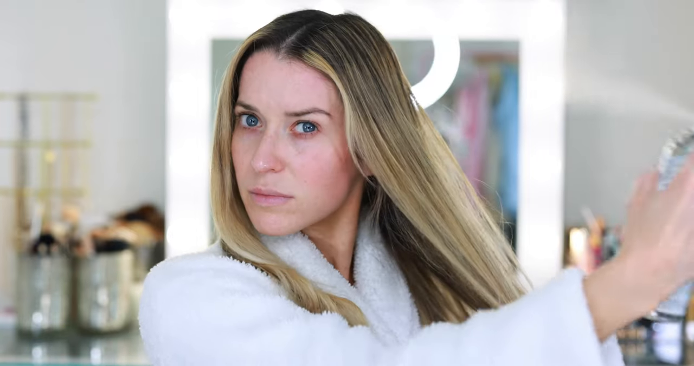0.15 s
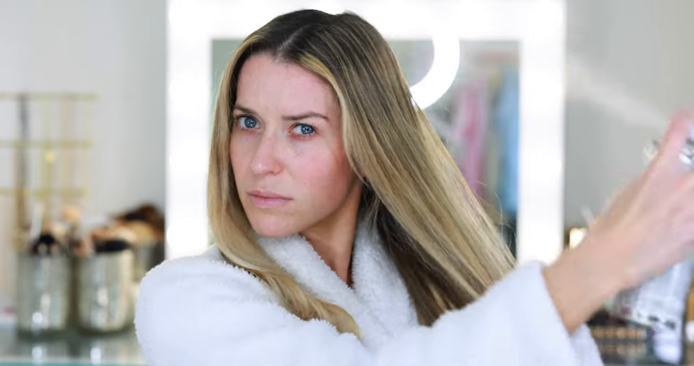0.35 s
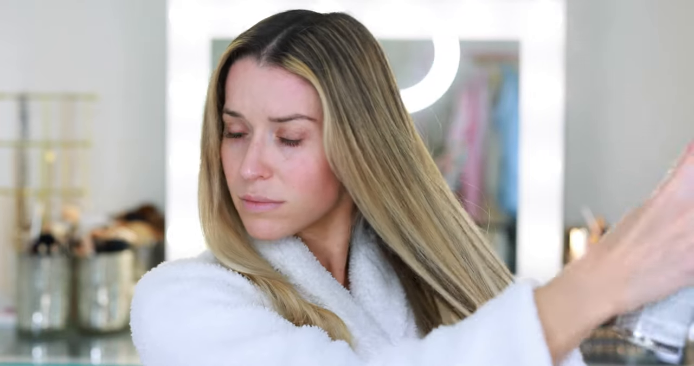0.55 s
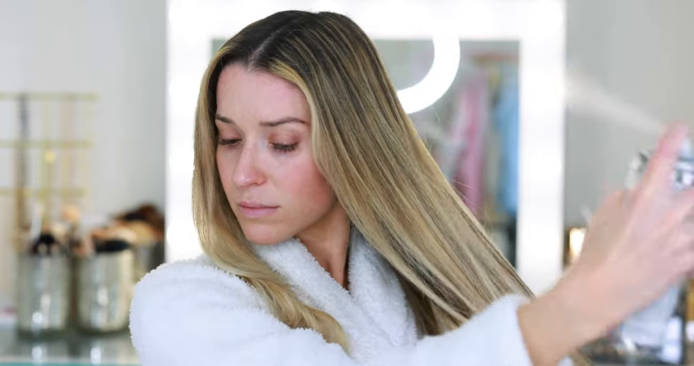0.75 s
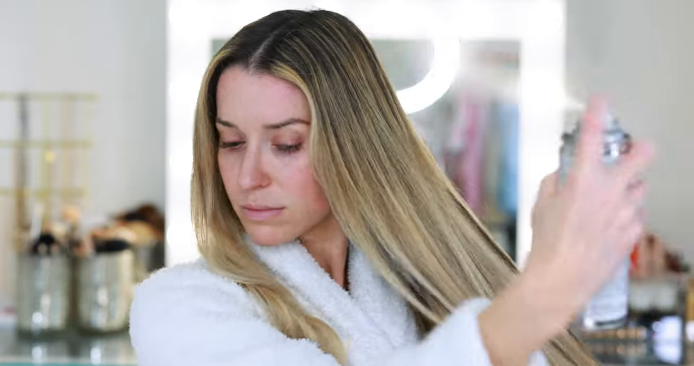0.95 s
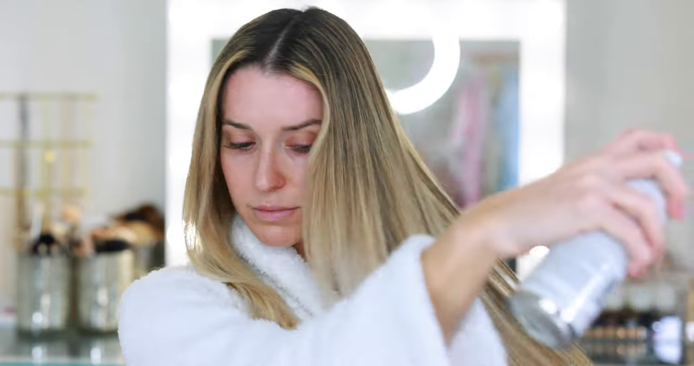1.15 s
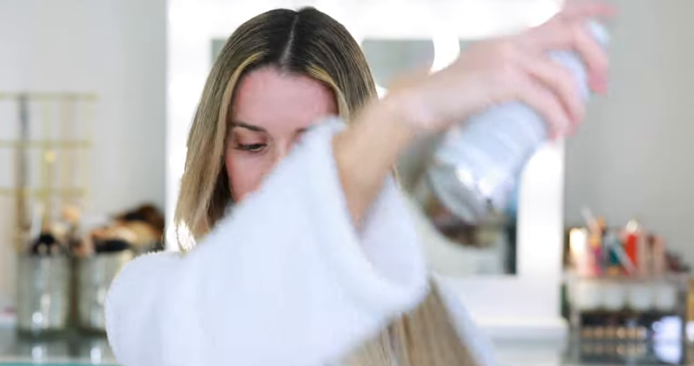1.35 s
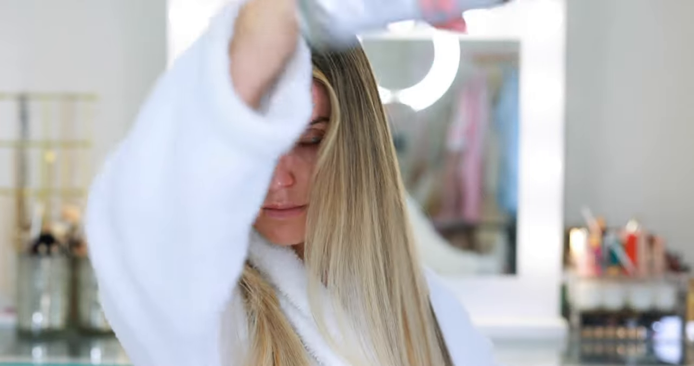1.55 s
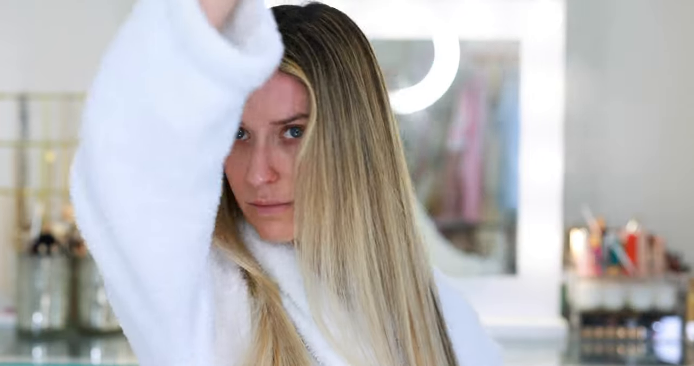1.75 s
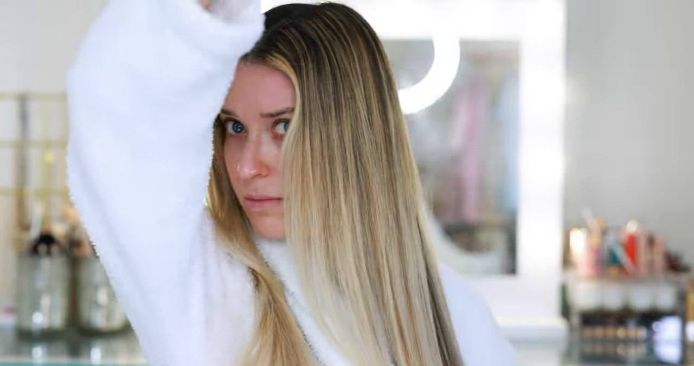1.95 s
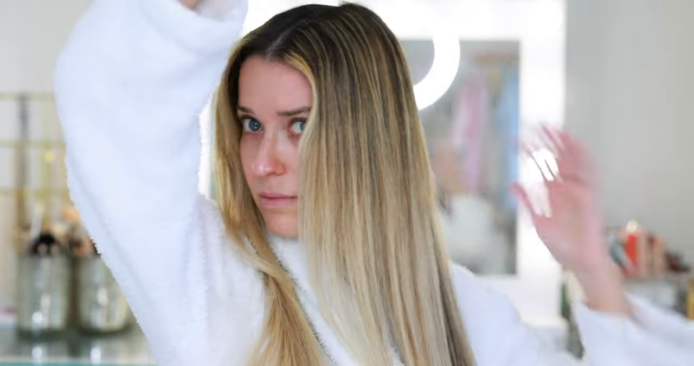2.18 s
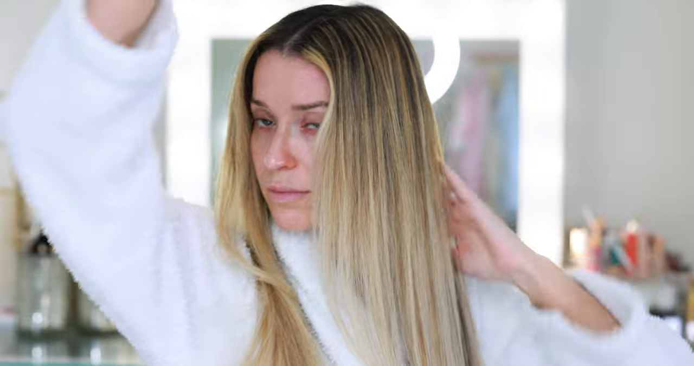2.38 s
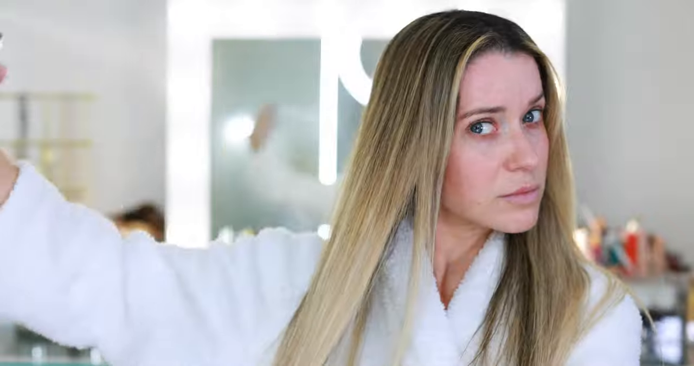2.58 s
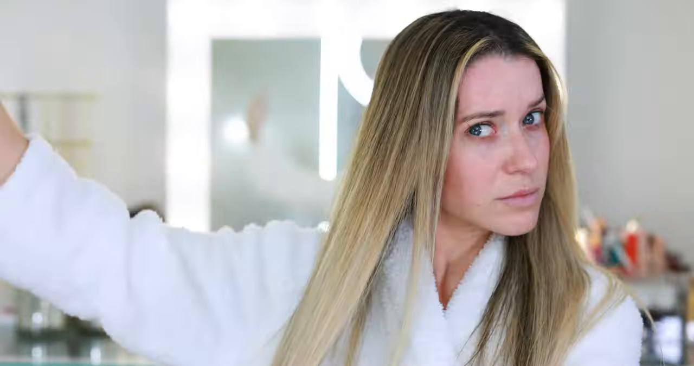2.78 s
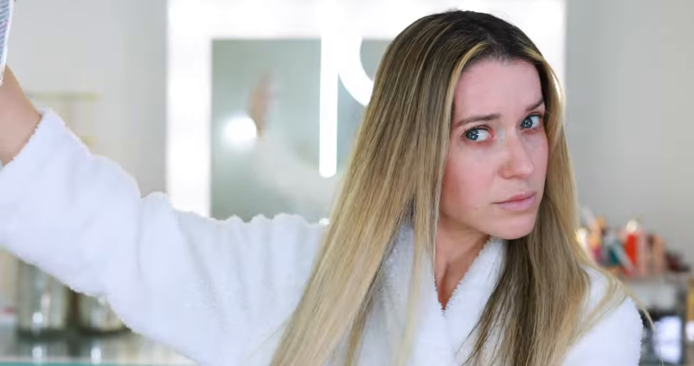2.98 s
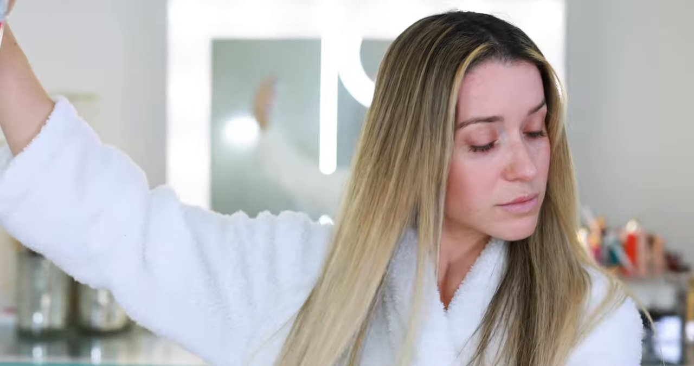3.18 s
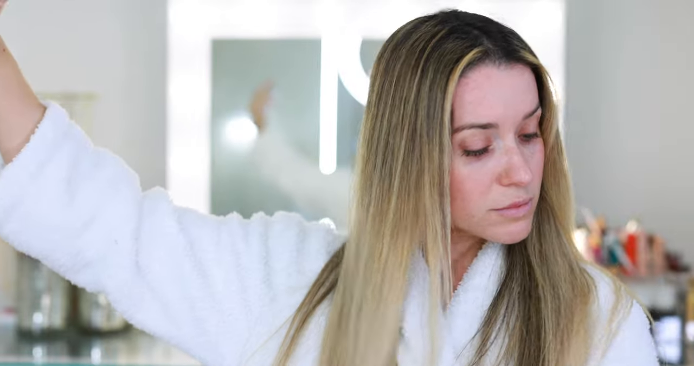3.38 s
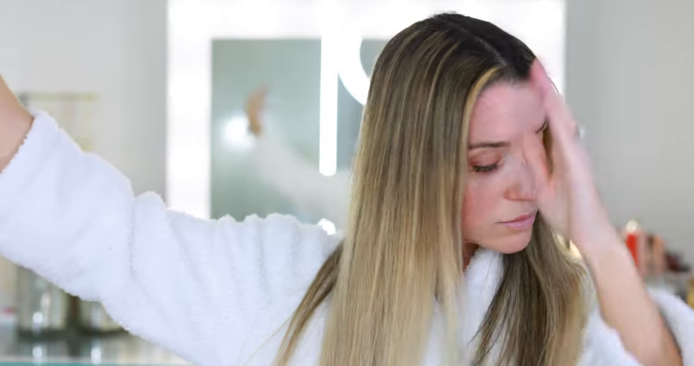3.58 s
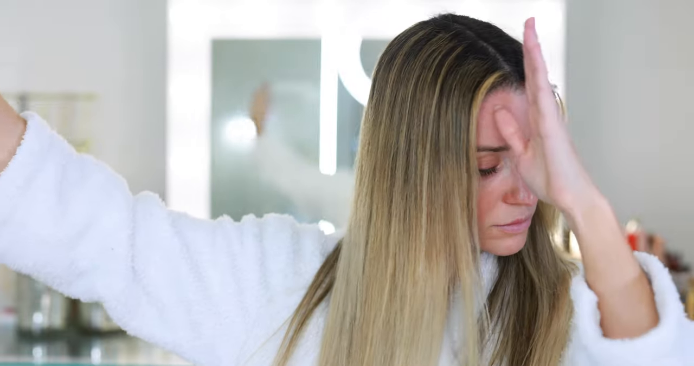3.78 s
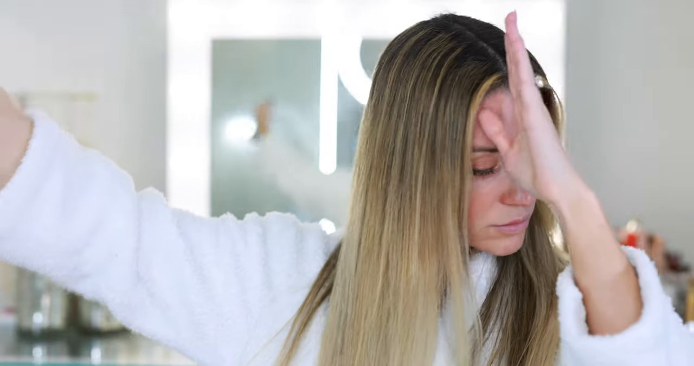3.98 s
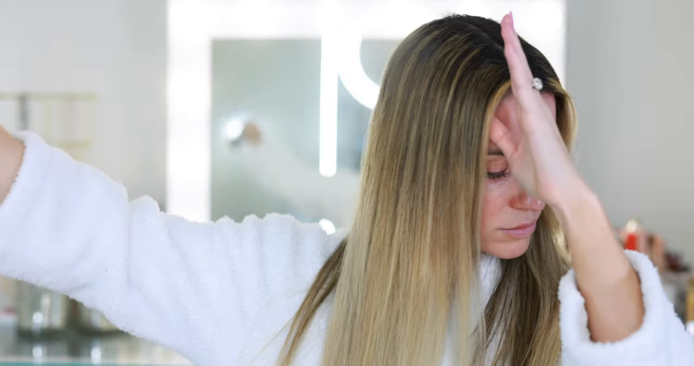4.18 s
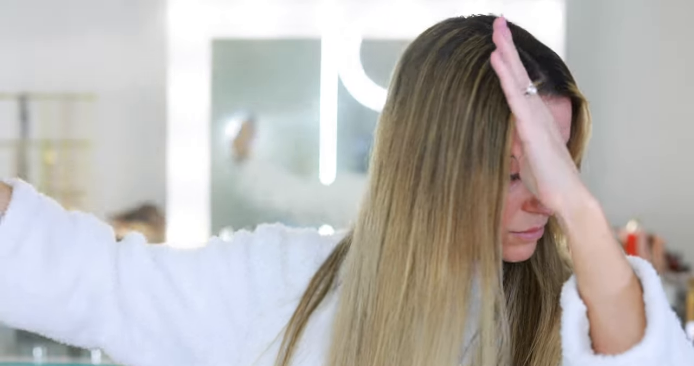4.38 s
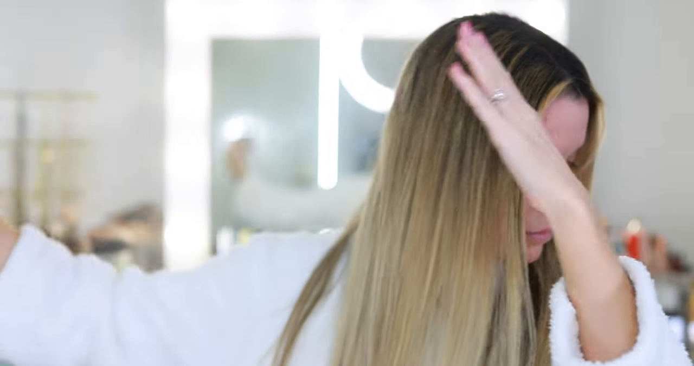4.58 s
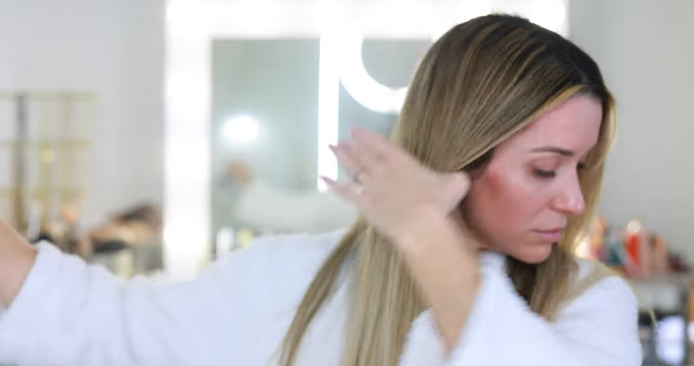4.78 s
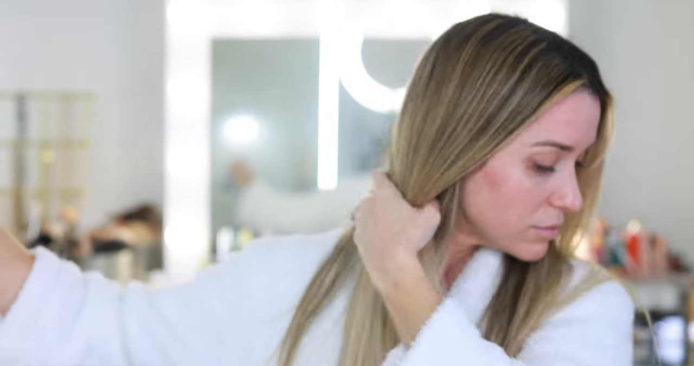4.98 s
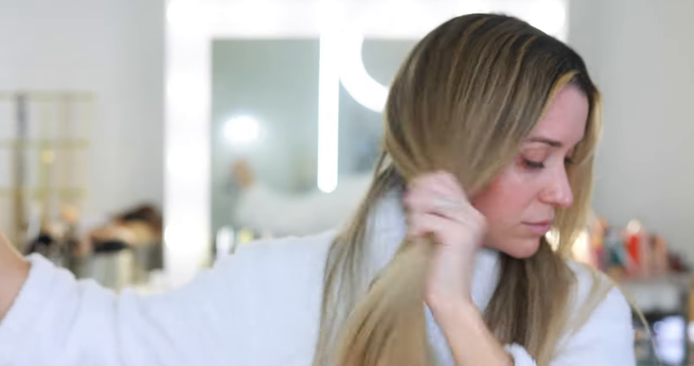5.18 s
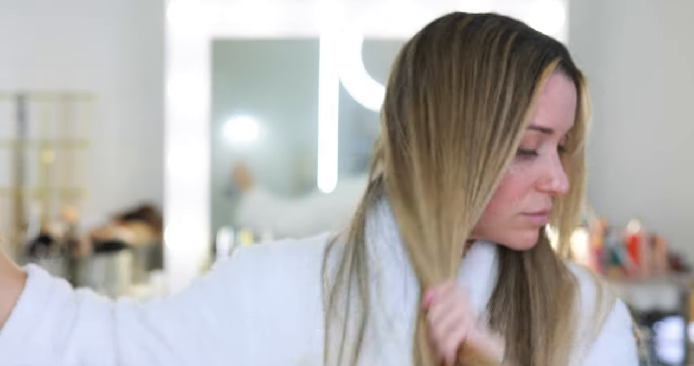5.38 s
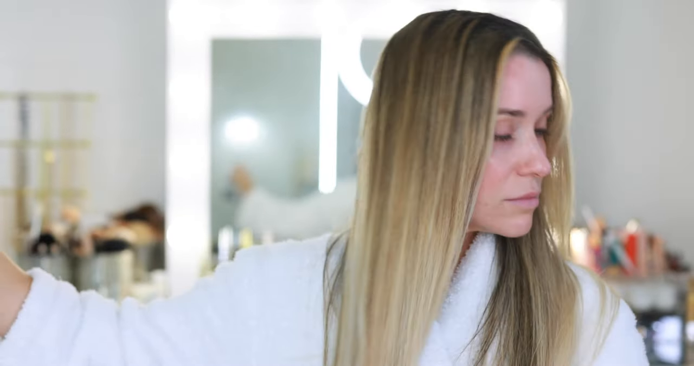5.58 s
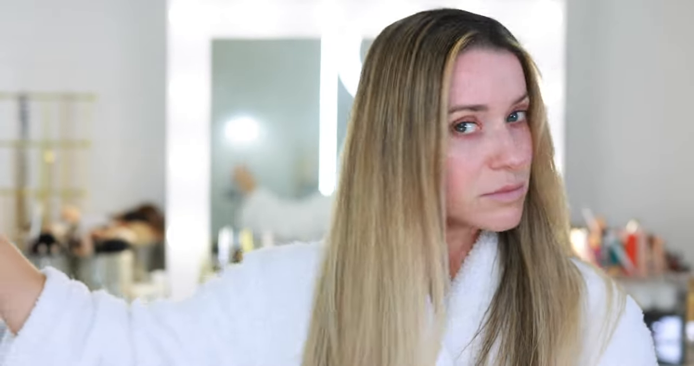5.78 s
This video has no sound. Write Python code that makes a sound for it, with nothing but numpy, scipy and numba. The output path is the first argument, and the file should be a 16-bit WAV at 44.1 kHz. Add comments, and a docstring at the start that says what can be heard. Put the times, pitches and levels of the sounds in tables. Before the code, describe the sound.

An aerosol can hisses in five bright, airy sprays of varying length, with faint hair rustles and small clicks between, in a quiet room.

```python
"""Small furnished room: an aerosol can, swung about near a microphone, mists long hair in five sprays.
Jet: noise bands and a nozzle resonance, levels driven by valve and swings; brief bands and whistles on top.
Between sprays: rustling noise of a hand in the hair, damped-cosine snaps, ringing ticks, soft low thumps.
Beneath: rumble noise, narrow drones and a wavering hum. A short dense tail follows jet and clicks."""
import sys
import numpy as np
from scipy import signal
from scipy.fft import rfft, irfft
from scipy.io import wavfile
from scipy.ndimage import uniform_filter1d
from numba import njit

SR = 44100
rng = np.random.default_rng(int(sys.argv[2]) if len(sys.argv) > 2 else 0)


def to_wav(s):
    """Save 16-bit WAV."""
    ch = np.atleast_2d(s).T  # columns
    pcm = np.round(np.clip(ch, -1, 1) * 32767)  # PCM
    wavfile.write(sys.argv[1], SR, pcm.astype(np.int16))


N = 257544
TIME = np.arange(N) / SR
FREQ = np.arange(N // 2 + 1) * SR / N + 1  # +1 Hz keeps the log finite

# can swings, jet points nearer the microphone: centre t/s, jet swell/dB (negative: dip), length/s,
# mist swell/dB, bright band rms at its height/dB, bright band f/Hz
SWINGS = [(0.225, 1.5, 0.1, 1, -54, 7700), (0.307, 4.5, 0.19, 1, -44, 8300),
          (0.991, 5, 0.16, 3, -49.5, 7800), (1.166, -2.5, 0.18, 2, -55.5, 5160),
          (1.924, 3, 0.16, 4, -50, 6100), (2.082, 3, .1, 3, -58, 7500), (2.735, 6, .15, 6, -49, 7040),
          (3.8, 1, .14, 0, -56, 7200), (3.998, 6, 0.14, 3.5, -43.5, 13600),
          (4.234, 6, 0.19, 3.5, -41, 14200), (4.523, 5, 0.19, 4, -40, 14300),
          (4.727, 7, 0.11, 5, -53, 13000)]
# rumble spectrum: f/Hz, relative density/dB per Hz
RUMBLE = [(12, -24), (20, -6.5), (49, -5), (137, -4.5), (197, -6), (326, -13.5), (375, -16), (496, -19),
          (586, -24.5), (819, -25), (916, -24.5), (1020, -23.5), (15800, -35)]
RUMBLE_RMS_DB = -61


def spray():
    """Turbulent jet: each part of its spectrum swells as the can turns, and flickers with the droplets."""
    # jet spectrum, sets the tilt inside each band: f/Hz, density/dB per Hz
    jet_density = [(180, -1.5), (400, -11), (800, -9), (1750, -7.5), (2700, -4.5), (3100, -12), (5000, -8),
                   (6200, -0.5), (8700, -0.5), (10500, 1.5), (13400, 1.5), (14600, 0), (15700, -1)]
    # jet bands, top to bottom: low edge f/Hz, high edge f/Hz
    band_edges_hz = [(9000, 17000), (5500, 9000), (3000, 5500), (1600, 3000), (600, 1600), (320, 600)]
    nozzle_width_hz, nozzle_trim_db, flicker_db = 2250, -4.5, 1.25
    cap_hz, cap_width_hz, cap_re_upper_mist_db = (2435, 2630), 100, -12.5

    bands_db, nozzle_hz, opening = valve()
    stutter_db = -6 * np.exp(-((TIME - .06) / .006) ** 2)  # the first jet catches once
    sputter_db = .5 * walk(60) + stutter_db

    # resonance of the nozzle bore
    bore = svf(rng.standard_normal(N), nozzle_hz, nozzle_width_hz)
    bore = svf(bore, nozzle_hz, nozzle_width_hz)
    out = undb(bands_db[1] + nozzle_trim_db + sputter_db) * unit(bore)

    trims_db = (0, -3.5, 0, 0, 0, 0)
    for (lo_hz, hi_hz), band_db, trim_db in zip(band_edges_hz, bands_db, trims_db):
        level_db = band_db + trim_db + sputter_db + flicker_db * walk(24.87)
        out = out + undb(level_db) * noise(shape(jet_density) * band(lo_hz, hi_hz, order=6))

    # hollows of the cap, blown on and off by the jet
    for hz in cap_hz:
        level_db = bands_db[3] + cap_re_upper_mist_db + 3.2 * walk(20)
        out = out + undb(level_db) * noise(peak(hz, cap_width_hz))
    return opening * out


def valve():
    """Valve lift: pressure spurts then settles, gas leads liquid; gives band dB, nozzle Hz and opening gain."""
    # one row a spray: opens t/s, shuts t/s, hiss/dB, nozzle re hiss/dB (before the nozzle trim),
    # mist re hiss/dB, middle re hiss/dB, low rush re mist/dB, nozzle f/Hz, attack/s, first spurt/dB,
    # mist arrives after/s, closing/s
    sprays = [(0.002, 0.441, -50, -1.5, -12.5, -5.5, -10.5, 7800, 0.016, 3, 0.099, 0.11),
              (0.742, 1.238, -50, -2.5, -9, -3.5, -12, 8100, 0.034, 4.5, 0.039, 0.074),
              (1.624, 2.104, -44.5, -3, -14, -7, -6.5, 7740, 0.0056, 3.5, 0.017, 0.043),
              (2.548, 2.799, -44.5, -4.5, -15, -8, -9, 6900, 0.0017, 2, 0.0055, 0.046),
              (3.734, 4.761, -44.5, -3.5, -13, -7, -10, 7400, 0.0056, -2.5, 0.056, 0.03)]
    spurt_s, spurt_nozzle_share = 0.08, 1.6
    mist_start_db, closing_db = -17.5, -27.5  # closing_db: fall per closing time
    swing_nozzle_share, swing_middle_share = 0.9, 0.58  # the treble is beamed most
    lag_middle_share, lag_upper_mist_share = 0.27, 0.51
    upper_mist_re_mist_db = 1.5  # band around the cap's hollows
    crack_open = 0.21  # share of the flow passing as soon as the valve lifts

    rows = np.array(sprays)
    which = np.clip(np.searchsorted(rows[:, 0], TIME) - 1, 0, None)
    (opens, shuts, hiss_db, nozzle_db, mist_db, middle_db, low_db,
     nozzle_hz, attack_s, spurt_db, arrives_s, closing_s) = rows[which].T

    since_s = np.maximum(TIME - opens, 0)
    spurt_db = spurt_db * np.exp(-(since_s / spurt_s) ** 2)
    lag_db = mist_start_db * np.exp(-(since_s / arrives_s) ** 3)  # gas first, liquid later
    swing_db = sum(row[1] * swell(row[0], row[2]) for row in SWINGS)
    mist_swing_db = sum(row[3] * swell(row[0], row[2]) for row in SWINGS)

    hiss_db = hiss_db + closing_db * np.maximum(TIME - shuts, 0) / closing_s
    mist_db = hiss_db + mist_db + mist_swing_db
    bands_db = (
        hiss_db + swing_db + spurt_db,
        hiss_db + nozzle_db + swing_nozzle_share * swing_db + spurt_nozzle_share * spurt_db,
        hiss_db + middle_db + swing_middle_share * swing_db + lag_middle_share * lag_db,
        mist_db + upper_mist_re_mist_db + lag_upper_mist_share * lag_db,
        mist_db + lag_db,
        mist_db + low_db + lag_db)
    opening = (since_s > 0) * np.minimum(crack_open + (since_s / attack_s) ** 2, 1)
    return bands_db, nozzle_hz, opening


def swing_beams():
    """Bright band of gas noise that swells with each swing of the can."""
    width_share, length_share = 0.26, 0.67  # of the band's centre, of the swing's length
    out = np.zeros(N)
    for s, _, length_s, _, db, hz in SWINGS:
        out += undb(db) * noise(peak(hz, width_share * hz)) * swell(s, length_share * length_s)
    return out


def whistles():
    """Brief breathy whistles of cap and valve seat: narrow swells of gas noise."""
    # centre t/s, rms at its height/dB, f/Hz, length/s
    whistle_rows = [(1.137, -58, 2720, 0.17), (1.688, -51.5, 2740, 0.047), (1.962, -57, 2600, 0.066),
                    (2.78, -56, 2580, .03), (2.892, -68, 2720, .04), (3.734, -60, 6900, .011),
                    (4.89, -70, 2800, .02)]
    width_hz = 260
    out = np.zeros(N)
    for s, db, hz, length_s in whistle_rows:
        out += undb(db) * noise(peak(hz, width_hz)) * swell(s, length_s)
    return out


def comb():
    """Soft rustle of towelling, brush of fingers and swish of hair, a little patchy in level."""
    # steady floor: cloth/dB, brush/dB, swish/dB
    floor_db = (-75.5, -83.5, -76.5)
    # strokes of hand and sleeve through the hair: centre t/s, length/s, cloth/dB, brush/dB, swish/dB
    strokes = [(0.54, 0.23, -74, -80, -82), (1.554, 0.53, -81, -76.5, -85), (2.474, .2, -80, -84, -79),
               (3.27, 0.17, -80, -78, -78), (3.457, .08, -71.5, -73, -78), (5.012, 0.072, -65, -89, -80),
               (5.08, 0.067, -65, -88, -77), (5.215, 0.13, -70, -74, -73), (5.415, 0.23, -74.5, -75, -66.5),
               (5.526, .12, -71.5, -66, -66.5), (5.602, 0.067, -71, -76, -66.5)]

    def stroke_gain(k):
        return undb(floor_db[k]) + sum(undb(row[2 + k]) * swell(*row[:2]) for row in strokes)

    cloth = stroke_gain(0) * undb(1.4 * walk(70)) * noise(band(120, 1360, order=2))
    brush = stroke_gain(1) * undb(1.2 * walk(60)) * noise(band(2300, 3800, order=3))
    swish = stroke_gain(2) * undb(.8 * walk(80)) * noise(band(6000, 14000, order=2))
    return cloth + brush + swish


def snaps():
    """Dry snaps: cosines that die within one or two cycles."""
    # t/s, peak before the high-pass/dB, f/Hz
    snap_rows = [(2.919, -44, 6000), (3.358, -58, 3000), (3.4438, -34.5, 4430), (3.449, -41, 3500),
                 (3.456, -56, 8000), (4.846, -41, 10800), (5.4933, -25, 8000), (5.614, -50, 11500),
                 (5.664, -49, 2300)]
    decay_cycles = 0.53  # to 1/e
    out, t = np.zeros(N), TIME[:2048]
    for s, db, hz in snap_rows:
        add(out, s, undb(db) * np.cos(2 * np.pi * hz * t) * np.exp(-t * hz / decay_cycles))
    # too small to push low tones
    return signal.sosfilt(signal.butter(2, 1800, 'high', fs=SR, output='sos'), out)


def ticks():
    """Ticks that ring the modes of a small metal part."""
    # t/s, level/dB, ring length as a share of the free ring
    tick_rows = [(3.3032, -44, .5), (3.307, -49, 2.1), (5.6571, -37.5, 0.94)]
    # modes of the free ring: f/Hz, level re tick/dB, t60/s
    modes = [(7480, 1, 0.011), (8800, 0.5, 0.0038), (10300, 1, .002), (12000, 0, .002), (13600, -2, .002),
             (15000, -7, .003)]
    out, t = np.zeros(N), TIME[:2048]
    contact = 1 - np.exp(-t / .0001)  # builds over about a cycle
    for s, db, free_share in tick_rows:
        ring = sum(undb(mode_db) * np.sin(2 * np.pi * hz * t) * 1000. ** (-t / (free_share * t60_s))
                   for hz, mode_db, t60_s in modes)
        add(out, s, undb(db) * contact * ring)
    return out


def thumps():
    """Soft thumps: short sines under a rounded swell."""
    # centre t/s, swell height/dB, f/Hz, length/s
    thump_rows = [(3.035, -46.5, 59, 0.028), (5.002, -52, 240, .012), (5.032, -51, 170, 0.015),
                  (5.084, -58, 604, 0.016), (5.5, -52, 25, 0.045), (5.615, -51.5, 50, .04)]
    return sum(undb(db) * np.sin(2 * np.pi * hz * (TIME - s)) * swell(s, length_s)
               for s, db, hz, length_s in thump_rows)


def hum():
    """Low sine that wavers in pitch and level."""
    # t/s, level before the waver/dB
    hum_level = [(0.0, -65), (1.5, -71.5), (1.7, -62.5), (2.6, -64.5), (3.4, -64), (3.55, -60.5),
                 (4.3, -59), (4.7, -64), (5.84, -64)]
    hum_hz, wander_rms_hz, waver_rms_db = 59.5, 2.53, 2
    s, db = np.transpose(hum_level)
    tone = np.sin(2 * np.pi * np.cumsum(hum_hz + wander_rms_hz * walk(8)) / SR)
    return undb(np.interp(TIME, s, db) + waver_rms_db * walk(6)) * tone


def drones():
    """Appliance tones ringing in the room: narrow peaks of noise."""
    # f/Hz, width/Hz, rms/dB
    drone_rows = [(129, 36, -70.5), (229.9, 14, -74), (381, 15, -76.5)]
    return sum(undb(db) * noise(peak(hz, width_hz)) for hz, width_hz, db in drone_rows)


def rumble():
    """Rumble and faint hiss of the room: shaped noise."""
    return undb(RUMBLE_RMS_DB) * noise(shape(RUMBLE))


def rumble_side():
    """Faint low rumble, the only difference between two close microphone ports."""
    # f/Hz, side re mid rumble/dB
    side_re_mid = [(30, -17.5), (300, -26), (700, -22.5), (1200, -50), (15000, -70)]
    return undb(RUMBLE_RMS_DB) * irfft(rfft(noise(shape(RUMBLE))) * shape(side_re_mid), N)


def room(x):
    """A short dense tail from walls, mirror and clothes; the treble dies sooner."""
    t60_s, late_t60_s, late_db = 0.25, 0.59, -24  # late: faint longer tail re the short one
    t = TIME[:SR // 2]
    dense = rng.standard_normal(len(t))
    low = signal.sosfilt(signal.butter(2, 8000, fs=SR, output="sos"), dense)
    tail = low * 1000. ** (-t / t60_s)
    tail += (dense - low) * 1000. ** (-t / (0.7 * t60_s))
    tail += undb(late_db) * dense * 1000. ** (-t / late_t60_s)
    tail *= t > .004  # gap before the first reflection
    return signal.fftconvolve(x, tail / np.sqrt(np.sum(tail ** 2)))[:N]


def undb(db):
    """dB to amplitude."""
    return 10 ** (np.asarray(db) / 20)


def unit(x):
    """Scale to rms 1."""
    return x / np.sqrt(np.mean(x ** 2))


def shape(points):
    """Gain at every frequency from (f/Hz, level/dB) points, straight over log f."""
    hz, db = np.transpose(points)
    return undb(np.interp(np.log(FREQ), np.log(hz), db))


def band(lo_hz, hi_hz, order):
    """Gain of a band with rounded edges."""
    return 1 / np.sqrt((1 + (lo_hz / FREQ) ** (2 * order)) * (1 + (FREQ / hi_hz) ** (2 * order)))


def peak(hz, width_hz):
    """Gain of a steep resonance, half amplitude at the edges of its width."""
    return 1 / (1 + ((FREQ - hz) / (width_hz / 2)) ** 2)


def noise(gain):
    """Noise of rms 1 with this gain over frequency."""
    return unit(irfft(rfft(rng.standard_normal(N)) * gain, N))


def walk(rate_hz):
    """Random levels of about rms 1, held 1 / rate and slewed twice."""
    k = int(SR / rate_hz)
    steps = np.repeat(rng.standard_normal(N // k + 1), k)
    return unit(uniform_filter1d(uniform_filter1d(steps, k), k)[:N])


def swell(s, length_s):
    """A rounded swell centred on its time, 1/e at the ends of its length."""
    return np.exp(-(2 * (TIME - s) / length_s) ** 2)


def add(out, s, sound):
    """Mix a sound into out, starting at s seconds."""
    i = int(s * SR)
    out[i:i + len(sound)] += sound[:N - i]


@njit
def svf(x, hz, width):
    """State-variable band-pass with a moving centre; width in Hz."""
    y, b, l = np.empty(len(x)), 0., 0.  # b, l: band and low states
    for i in range(len(x)):
        g, k = np.tan(np.pi * hz[i] / SR), width / hz[i]
        v = (b + g * (x[i] - l)) / (1 + g * (g + k))
        b, l, y[i] = 2 * v - b, l + 2 * g * v, k * v
    return y


def scene():
    """Sum the sources; jet and clicks also feed the room; mid and side give left and right."""
    jet = spray() + swing_beams() + whistles()
    clicks = snaps() + ticks()
    tail = room(undb(-9.5) * jet + undb(-21) * clicks)
    background = rumble() + drones() + hum()
    mid = jet + clicks + tail + comb() + thumps() + background
    side = rumble_side()
    return np.array([mid + side, mid - side])


def record(dry):
    """The recorder cuts the top steeply."""
    top_hz = 15720
    return signal.sosfilt(signal.ellip(14, .2, 65, top_hz, fs=SR, output="sos"), dry)


dry = scene()
out = record(dry)
to_wav(out)
```